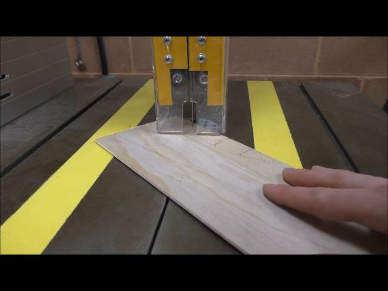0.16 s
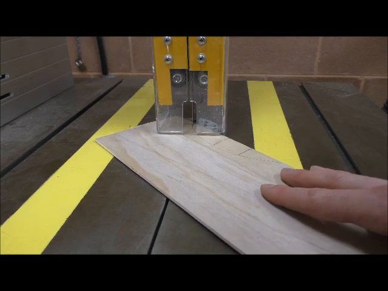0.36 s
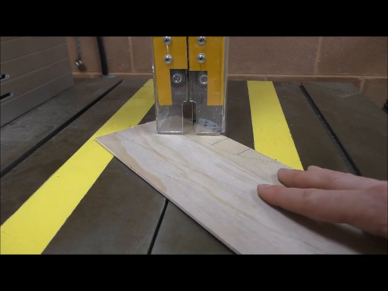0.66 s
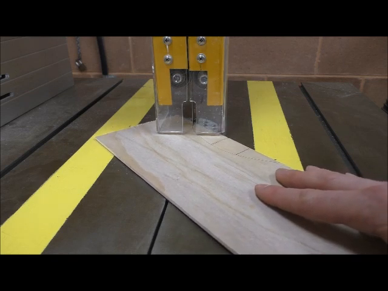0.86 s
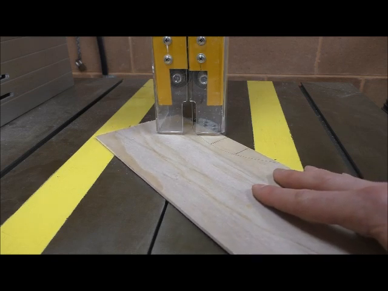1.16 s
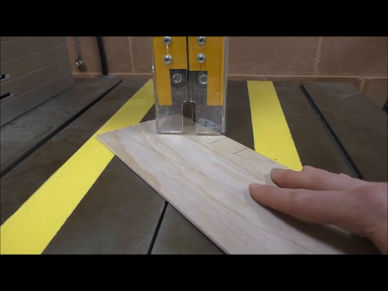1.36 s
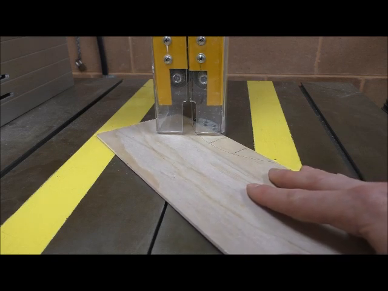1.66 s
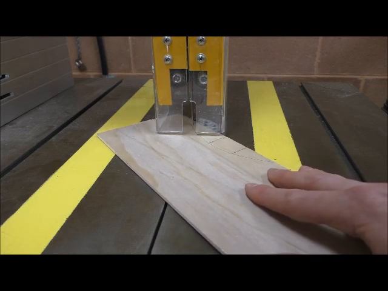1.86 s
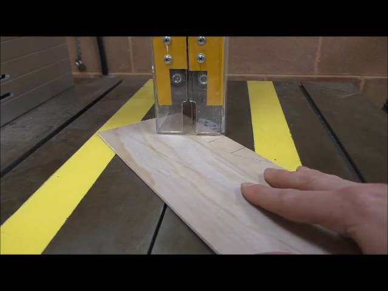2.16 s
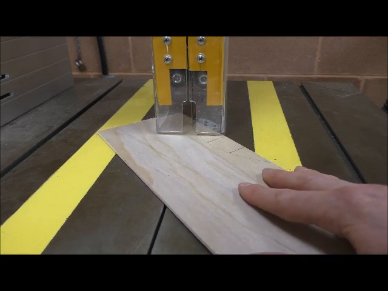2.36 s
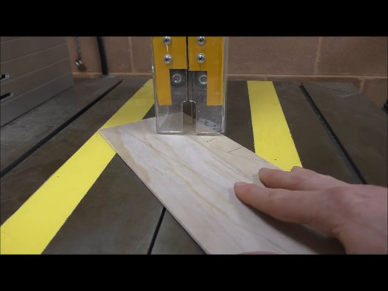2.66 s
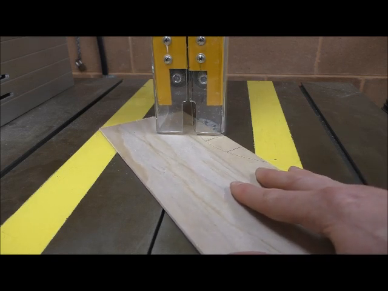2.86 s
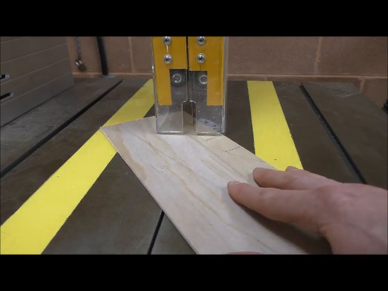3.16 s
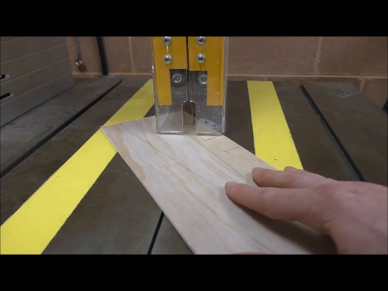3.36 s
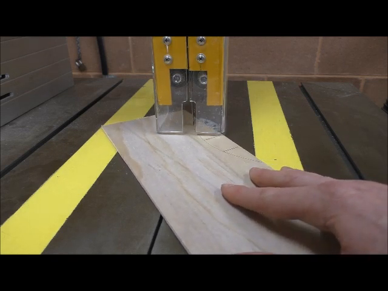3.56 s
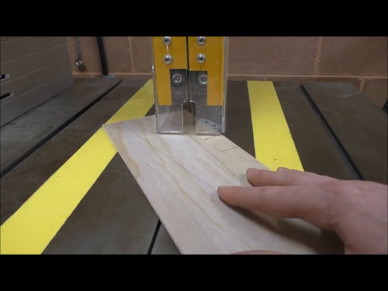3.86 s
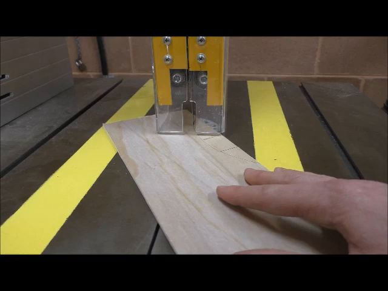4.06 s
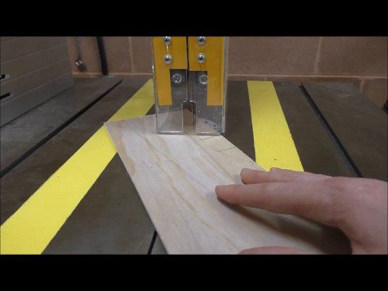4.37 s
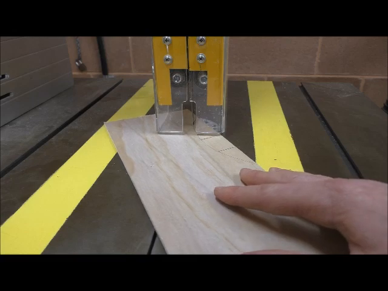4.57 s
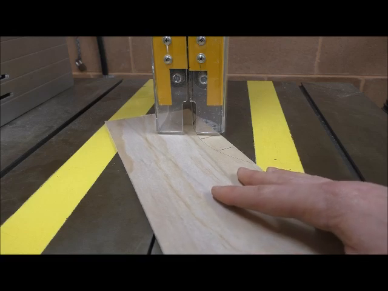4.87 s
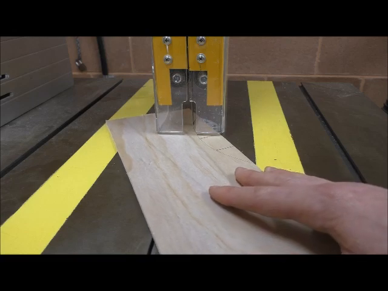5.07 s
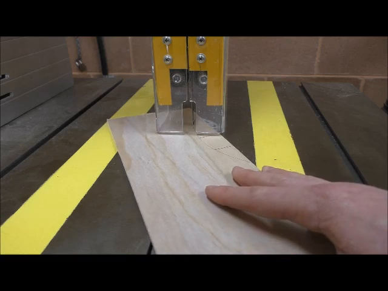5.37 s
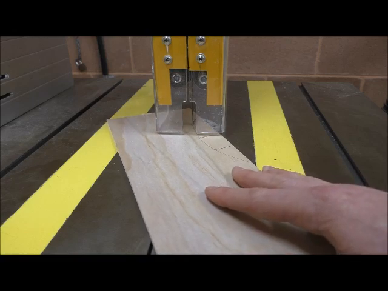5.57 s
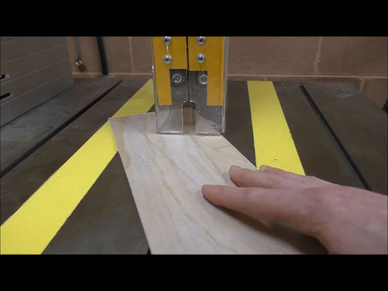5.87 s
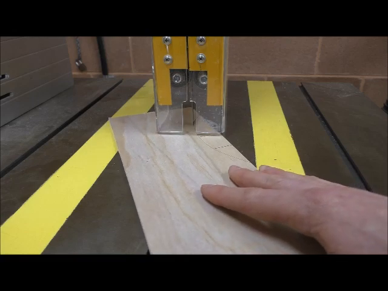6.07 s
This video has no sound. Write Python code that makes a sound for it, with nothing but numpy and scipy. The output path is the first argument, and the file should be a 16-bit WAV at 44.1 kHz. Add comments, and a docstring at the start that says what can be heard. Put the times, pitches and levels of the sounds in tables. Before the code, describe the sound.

Close-up of a bandsaw in a small, fairly dry workshop. Fast blade teeth blend into a buzzing, sizzling hiss through thin wood, with a regular thud each blade lap. Squeals slide downward at first, the hiss grows sharper midway, then the turning board rings and chatters with splinter snaps and brief drops in force. A faint motor hum and table rumble stay far below the cut.

```python
"""Bandsaw cutting a curve in plywood

A bandsaw cuts thin plywood; every tooth is a short strike plus a fading burst of chip noise.
Proud teeth and the weld return with each lap of the blade, and splinters crack off at random.
This sound drives the resonances of blade and board, whose colour shifts as the board is turned.
Sines and filtered noise add whines, board ring, motor hum and rumble; the cut and frame get short
reflections, and a faint low wash of room noise lies underneath."""
import sys
import numpy as np
from scipy import signal
from scipy.io import wavfile
from scipy.ndimage import uniform_filter1d, map_coordinates

SR = 44100
rng = np.random.default_rng(int(sys.argv[2]) if len(sys.argv) > 2 else 0)


def store_wav(level_fs):
    """Save 16-bit WAV to argv[1]."""
    pcm = np.round(np.clip(np.atleast_2d(level_fs), -1, 1) * 32767)
    wavfile.write(sys.argv[1], SR, pcm.T.astype(np.int16))


N = 273861
TIME = np.arange(N) / SR


def from_db(db):
    """Decibels to gain."""
    return 10 ** (np.asarray(db) / 20)


def rms_one(x):
    """Scale to unit power."""
    return x / np.sqrt(np.mean(x ** 2) + 1e-20)


def evened(x, size=22000):
    """Unit power over a running window of size samples; faster detail stays."""
    return x / np.sqrt(uniform_filter1d(x ** 2, size) + 1e-20)


def in_time(rows):
    """Each column of a curve at every sample."""
    s, *columns = np.transpose(rows)
    return [np.interp(TIME, s, column) for column in columns]


def swell(at_s, spread_s):
    """A smooth rise to 1 and fall again."""
    return np.exp(-.5 * ((TIME - at_s) / spread_s) ** 2)


def spells(rows, edge_s):
    """Each row holds its level from start to end, with soft edges; 0 in between."""
    total = 0
    for start_s, end_s, db in rows:
        gate = .5 * (np.tanh((TIME - start_s) / edge_s) - np.tanh((TIME - end_s) / edge_s))
        total = total + db * gate
    return total


def drift(rate):
    """Smooth chance of spread 1 with rate new random points a second."""
    knots = rng.standard_normal(4000)
    return rms_one(map_coordinates(knots, [TIME * rate], order=3, mode="wrap"))


def band(x, low_hz, high_hz, order=2):
    """Butterworth band-pass."""
    return signal.sosfilt(signal.butter(order, [low_hz, high_hz], "band", fs=SR, output="sos"), x)


def below(x, hz):
    """The part under an edge, without delay, so that the remainder joins it again seamlessly."""
    return signal.sosfiltfilt(signal.butter(4, hz, fs=SR, output="sos"), x)


def resonance(x, hz, width_hz):
    """A damped mode with gain 1 on its top."""
    return signal.lfilter(*signal.iirpeak(hz, hz / width_hz, fs=SR), x)


def noise_bursts(snaps, decay_s):
    """Each snap starts a burst of noise that falls away exponentially."""
    envelope = signal.lfilter([1], [1, -np.exp(-1 / (decay_s * SR))], snaps + 1e-18)
    return envelope * rng.standard_normal(N)


def tone(hz, waver_db, wobble_rad):
    """A machine tone that wavers a little in level and phase; rms 1."""
    phase = 2 * np.pi * hz * TIME + wobble_rad * drift(7.3)
    return rms_one(from_db(waver_db * drift(11)) * np.sin(phase))


def placed(x, pan_db, lead_s):
    """A source off centre is louder and earlier at the nearer ear (+ is left)."""
    ears = []
    for side in (.5, -.5):
        ears.append(from_db(side * pan_db) * np.interp(TIME + side * lead_s, TIME, x))
    return np.array(ears)


def room_tone(floor_db):
    """The faint low wash of the workshop, as band-passed noise."""
    return from_db(floor_db) * rms_one(band(rng.standard_normal(N), 24, 340, order=1))


def workshop(x, t60, thin_hz, dull_hz, wet_db):
    """Dense, dull reflections from the table or the walls: decaying noise, different at each ear."""
    age = TIME[:SR // 2]
    tail = rng.standard_normal((2, len(age))) * from_db(-60 * age / t60) * (age > .002)
    tail /= np.sqrt(np.sum(tail ** 2, axis=1, keepdims=True))
    tail = band(tail, thin_hz, dull_hz, order=1)
    return from_db(wet_db) * signal.fftconvolve(x[None], tail, axes=1)[:, :N]


def motor_hum():
    """Low motor tones swell and fade in one long arch."""
    # tones of the motor: pitch_hz, level_db (relative to the hum), arch_share (of the arch in dB)
    motor_tones = [(114.6, -22.5, 0.46), (227.3, 0.5, 0.94)]
    hum_db, peak_s, rise_db_per_s2, fall_db_per_s2 = -53.5, 2.68, 3, 2.5
    arch_db = -np.where(TIME < peak_s, rise_db_per_s2, fall_db_per_s2) * (TIME - peak_s) ** 2
    hum = 0
    for hz, db, share in motor_tones:
        hum = hum + from_db(hum_db + db + share * arch_db) * tone(hz, waver_db=1.67, wobble_rad=0.12)
    return hum


def machine_frame(feed_db, tones_feed_share):
    """Steady low tones grow as the board is swung round; the frame rumbles with the push."""
    # steady low tones: pitch_hz, level_db (before trim, push and swell)
    low_tones = [(86, -89), (258.4, -66.5)]
    # spells in which the board drums on the table more (+) or less (-):
    # start_s, end_s, level_db (about the resting rumble)
    rumbles = [(0, .55, -3.5), (.66, .85, 4.5), (1.08, 1.27, 5), (1.33, 1.6, -6), (1.9, 2.8, 3),
               (4.12, 4.4, 4), (4.68, 4.98, 4), (5.08, 5.24, 9), (5.5, 5.75, 5)]
    trim_db, swell_db = -5.5, 10
    tones_db = trim_db + tones_feed_share * feed_db + swell_db * swell(at_s=3.83, spread_s=0.53)
    tones = 0
    for hz, db in low_tones:
        tones = tones + from_db(db + tones_db) * tone(hz, waver_db=2.5, wobble_rad=0.76)
    rumble_db, feed_share = -70.5, 0.51
    rumble_db = rumble_db + feed_share * feed_db + spells(rumbles, edge_s=0.02)
    rumble = from_db(rumble_db) * evened(band(rng.standard_normal(N), 140, 197), size=7000)
    return tones + rumble


def flutter(width_hz):
    """The band flutters between its guides: narrow noise makes blurred low tones that swell once."""
    # flutter tones: pitch_hz, level_db (relative to the flutter)
    flutter_tones = [(387, -5.5), (516, 0), (645, -1)]
    resting_db, swell_db = -77.5, 14.5
    level_db = resting_db + swell_db * swell(at_s=1.09, spread_s=0.46)
    out = 0
    for hz, db in flutter_tones:
        blurred = resonance(resonance(rng.standard_normal(N), hz, width_hz), hz, width_hz)
        out = out + from_db(level_db + db) * evened(blurred)
    return out


def singing(travel, feed_db):
    """Thin clean tones: a whine at twice the tooth rate, a side tone and the guide bearing."""
    # spells in which the band whines: start_s, end_s, level_db (above its resting level)
    whines = [(.47, .75, 15.5), (.8, 1.02, 15), (1.15, 1.3, 8), (1.45, 1.9, 12), (1.9, 2.88, 12.5),
              (4.85, 5.7, 7.5)]
    whine_db = -68.5 + spells(whines, edge_s=0.031)
    waver = from_db(1.3 * drift(20))
    whine = from_db(whine_db) * rms_one(waver * np.sin(2 * np.pi * 2 * travel))

    side_order = 2.8846   # multiple of the tooth rate, just under the third harmonic
    side_db, feed_share = -75, 0.63
    side_tone = rms_one(np.sin(2 * np.pi * side_order * travel))
    side_tone = from_db(side_db + feed_share * feed_db) * side_tone

    # the bearing sings as the band is twisted against it
    bearing_db = -84 + 22.5 * swell(at_s=4.65, spread_s=1.16)
    bearing = from_db(bearing_db) * tone(1416, waver_db=2.5, wobble_rad=0.8)
    return whine + side_tone + bearing


def knocks(weld, feed_db, low_hz, high_hz):
    """The weld drags through the kerf with a wooden thud each lap, harder as the curve tightens."""
    start_db, growth_db_per_s, feed_share = -54.5, 0.96, 0.17
    level_db = start_db + growth_db_per_s * TIME + feed_share * feed_db
    return from_db(level_db) * weld * evened(band(rng.standard_normal(N), low_hz, high_hz), size=400)


def board_ring(travel, steady_db, chatter_db, waver_db, stray_hz):
    """The board rings at the tooth rate, and around a slightly lower, wobbling pitch as it chatters."""
    # shared level of both rings: time_s, level_db (before the steady and chatter levels)
    ring_curve = [(0.05, -72), (0.2, -58.5), (1.0, -56.5), (1.65, -67), (2.3, -60), (2.9, -55.5),
                  (3.4, -56), (4.27, -50), (4.38, -61), (4.52, -48), (5.0, -48.5), (5.15, -60.5),
                  (5.62, -42.5), (5.82, -66), (6.0, -73), (6.05, -44.5), (6.11, -72)]
    centre_hz, wobble_hz, wobbles_per_s = 1099.7, 15.2, 9.83
    hz = centre_hz + wobble_hz * np.cos(2 * np.pi * wobbles_per_s * TIME) + stray_hz * drift(40)
    waver = from_db(waver_db * np.tanh(drift(21.94)))
    chatter = rms_one(waver * np.sin(2 * np.pi * np.cumsum(hz) / SR))
    steady = rms_one(np.sin(2 * np.pi * travel))
    level = from_db(in_time(ring_curve)[0])
    return level * (from_db(steady_db) * steady + from_db(chatter_db) * chatter)


def blade(x):
    """The steel band rings in several damped modes at once."""
    # ringing modes of the band: pitch_hz, width_hz, level_db (relative to what strikes it)
    blade_modes = [(3170, 1450, -10.5), (7060, 970, -6.5), (9040, 370, -12.5), (10180, 510, -2),
                   (11800, 420, -2), (13450, 210, -4)]
    return sum(from_db(db) * resonance(x, hz, width_hz) for hz, width_hz, db in blade_modes)


def splinters(per_s, size_db, decay_s):
    """Now and then a fibre snaps: a randomly timed, short noise burst."""
    scatter_db = np.clip(rng.standard_normal(N), -2, 1.5)
    snaps = (rng.random(N) < per_s / SR) * from_db(size_db + scatter_db)
    return noise_bursts(snaps, decay_s)


def cracks(trim_db, decay_s, ring_db):
    """A larger splinter breaks off with a bright snap that sets the band ringing."""
    # the loudest splinters: time_s, level_db (before trim, filtering and ring)
    loud_splinters = [(3.2725, -23), (4.267, -27), (4.7229, -20), (4.754, -23), (5.056, -21), (5.6777, -30),
                      (5.9847, -24), (6.016, -28)]
    snaps = np.zeros(N)
    for s, db in loud_splinters:
        snaps[int(s * SR)] = from_db(db + trim_db)
    burst = noise_bursts(snaps, decay_s)
    return band(burst, 2800, 14000, order=1) + from_db(ring_db) * blade(burst)


def near(lap, place, width):
    """A bump each time a place on the blade passes through the wood; place and width in laps."""
    distance = (lap - place + .5) % 1 - .5
    return np.exp(-.5 * (distance / width) ** 2)


def teeth(travel, proud_db, proud_share, scatter_db, flutter_db, chip_decay, strike_db,
          snag_share, snag_noise_db):
    """Every tooth gives a sharp strike and a burst of tearing fibres; proud teeth also snag the band."""
    tooth = travel.astype(int)
    # the wood is uneven, from tooth to tooth and in a faster-than-lap drift
    grain_db = scatter_db * rng.standard_normal(8000)[tooth] + flutter_db * drift(130)
    # a triangle about two samples wide whenever a tooth arrives
    strikes = np.maximum(0, 1 - np.abs(travel - np.round(travel)) / np.gradient(travel))
    strikes = rms_one(strikes)
    # chip_decay is a share of the tooth spacing
    chips = rms_one(rng.standard_normal(N) * np.exp(-(travel % 1) / chip_decay))
    tearing = from_db(proud_share * proud_db + grain_db) * (chips + from_db(strike_db) * strikes)

    catch = (from_db(snag_share * proud_db) - 1) * from_db(grain_db)
    rebound = 0.37 * catch.mean()   # between snags the band springs back
    snags = (catch - rebound) * strikes + catch * from_db(snag_noise_db) * chips
    return rms_one(tearing), rms_one(snags)


def sliding(x, glide):
    """A resonance whose centre moves: it is followed in a frame that turns with it."""
    width_hz = 250
    hz, boost_db = in_time(glide)
    turning = np.exp(2j * np.pi * np.cumsum(hz) / SR)
    keep = np.exp(-np.pi * width_hz / SR)
    smoothed = signal.lfilter([1 - keep], [1, -keep], x / turning)
    return (from_db(boost_db) - 1) * 2 * np.real(turning * smoothed)


def body_and_board(x):
    """Fixed, waking and sliding resonances colour the cut; each adds its peak or hollow."""
    # lasting peaks and hollows of blade, guard and table: pitch_hz, width_hz, boost_db
    body = [(535, 105, -8), (1233, 170, 4), (1600, 1200, -5), (5280, 770, -8), (9860, 220, 1),
            (12200, 190, 5.5), (13500, 170, 3), (14500, 240, 7.5), (15800, 200, 3)]
    # modes and hollows that wake and fade as the board turns:
    # pitch_hz, width_hz, boost_db (at its strongest), strongest_s, spread_s
    board_modes = [(313, 31, 8.5, 0.3, 0.33), (380, 150, 6, 4.86, 0.18), (990, 190, 22, 3.64, 0.72),
                   (1060, 220, 14, 5.26, 0.32), (1230, 610, 7, 2.2, 1.2), (1434, 66, 15.5, 0.28, 0.88),
                   (1650, 150, -5.5, 0.88, 0.89), (1410, 60, 6, 5.3, 0.8), (2615, 87, 14, 0.26, 0.6),
                   (2650, 160, 7, 5.69, 0.14), (2660, 350, 4.5, 2.81, 0.093), (3220, 31, 10, 5.69, 0.061),
                   (3442, 120, 14.5, 3.54, 0.65), (3596, 80, 13.5, 1.1, 1.04),
                   (3880, 220, 12.5, 5.06, 0.34), (3770, 120, 15, 6.14, 0.44), (4650, 850, 8.5, 2.46, 0.23),
                   (4700, 170, -13, 4.8, 0.99), (6230, 170, -9, 5.7, 0.41), (6650, 560, -10, 0.33, 0.89),
                   (6870, 140, -13, 5.1, 0.34), (6860, 500, 4.5, 6, 0.2), (7380, 320, 5.5, 0.98, 0.7),
                   (9140, 240, -9, 4.4, 0.9), (4990, 220, 17, 5.76, 0.58), (5260, 120, 20.5, 4.02, 0.7),
                   (5640, 240, 14.5, 5.04, 0.3), (5370, 860, 7.5, 0.14, 0.81),
                   (6434, 410, 16.5, 4.05, 1.05), (7170, 410, 10.5, 5.2, 0.99), (7930, 780, 14, 2.83, 0.24),
                   (8100, 150, 12.5, 4, 0.42), (8250, 640, -17, 1.7, 0.53), (8700, 97, 13.5, 3.55, 0.68),
                   (8820, 350, 7.5, 0.33, 2.1), (9560, 450, 14.5, 3.56, 0.73), (10220, 520, 9.5, 5, 0.57),
                   (10700, 250, -16, 3.2, 0.56), (10920, 250, 17.5, 3.1, 1.22),
                   (11040, 1300, 12.5, 0.22, 0.21), (11250, 700, -17, 5.8, 0.4),
                   (13350, 350, 14, 5.67, 0.54), (13200, 460, -11, 0.89, 0.4), (12850, 300, -19, 3.5, 0.44),
                   (13500, 820, 10.5, 3.3, 0.77), (15000, 1100, 4, 1.9, 0.77)]
    # two squealing resonances, the lower taking over from the upper: time_s, pitch_hz, boost_db
    upper_squeal = [(0.2, 4760, 10), (0.27, 4630, 16.5), (0.42, 4400, 10), (0.55, 4430, 15),
                    (0.76, 4570, 6), (1.0, 4530, 7), (1.35, 4500, 1)]
    lower_squeal = [(0.6, 4160, 6), (0.72, 4100, 10), (0.92, 4000, 11.5), (1.05, 3780, 7), (1.24, 3600, 8),
                    (1.4, 3450, 5), (1.7, 3450, -2.5)]
    # a higher scrape resonance, lower by the end: time_s, pitch_hz, boost_db
    scrape_mode = [(2.9, 6620, 7.5), (3.55, 6720, 6.5), (4.1, 6700, 5), (4.45, 6400, 10), (4.781, 6400, 7),
                   (4.98, 6300, -1)]
    # a last short sinking squeal: time_s, pitch_hz, boost_db
    late_squeal = [(5.2, 4800, 3), (5.33, 4650, 4), (5.5, 4480, 9), (5.62, 4400, -1), (5.9, 4400, -3)]
    for hz, width_hz, boost_db in body:
        x = x + (from_db(boost_db) - 1) * resonance(x, hz, width_hz)
    for hz, width_hz, boost_db, at_s, spread_s in board_modes:
        x = x + (from_db(boost_db * swell(at_s, spread_s)) - 1) * resonance(x, hz, width_hz)
    return x + sum(sliding(x, glide) for glide in (upper_squeal, lower_squeal, scrape_mode, late_squeal))


def balanced(x, feed_db, grip_db, proud_db, lowest_hz, uneven_db, flicker_db):
    """Each register follows push, grip and bite by its own share, and swells as the board turns."""
    # registers of the cut: upper_edge_hz, level_db (before push, grip, swells and chance),
    # feed_share, grip_share, bite_share (shares of the dB curves, bite is that of the proud teeth)
    registers = [(708, -63.5, 0.65, 0.29, 0.13), (1700, -52.5, 0.96, 0.38, 0.14),
                 (5700, -45, 0.71, 0.41, 0.039), (8260, -52, 0.61, 1.16, 0.15),
                 (12020, -44.5, 0.44, 0.89, 0.045), (17000, -51, 0.5, 1.3, .15)]
    # swells of the hiss: around_hz (picks the register), strongest_s, spread_s, level_db
    hiss_swells = [(1100, 3.39, 0.23, 4), (1100, 5.1, 0.52, -1.4), (3500, 0.82, 0.5, 5),
                   (3500, 1.19, 0.056, 2.5), (3500, 3.6, 0.35, -1), (3500, 6, 0.12, 6.5),
                   (3500, 4.93, 0.033, 1.5), (3500, 5.7, 0.046, 0.5), (3500, 2.97, 0.055, 2),
                   (3500, 6.18, 0.031, 5), (6500, 2, 0.2, 7.5), (6500, 3.69, 0.56, 14.5),
                   (6500, 4.51, 0.15, 4.5), (10000, 2.86, 0.57, 4), (10000, 3.8, 0.91, 4.5),
                   (14000, 2, 0.95, 11.5), (14000, 4.1, 0.69, -4), (14000, 4.96, 0.28, 6.5)]
    out, low_hz = 0, lowest_hz
    rest = x - below(x, lowest_hz)
    wood_db = uneven_db * drift(18)   # harder and softer patches in the plies
    for edge_hz, level_db, feed_share, grip_share, bite_share in registers:
        register = below(rest, edge_hz)
        turn_db = 0
        for hz, at_s, spread_s, db in hiss_swells:
            if low_hz < hz <= edge_hz:
                turn_db = turn_db + db * swell(at_s, spread_s)
        chance_db = wood_db + flicker_db * drift(25)
        gain_db = level_db + feed_share * feed_db + grip_share * grip_db + turn_db + chance_db
        out = out + from_db(gain_db) * evened(register * from_db(bite_share * proud_db))
        rest, low_hz = rest - register, edge_hz
    return out


def cut(feed_db, weld_db, weld_width, slip_teeth, proud_width, lowest_hz):
    """The teeth drive the resonances; the thick weld swells the cut and knocks the board once a lap."""
    # blade speed: time_s, teeth_per_s
    speed = [(0, 1115.6), (1.5, 1113.9), (2.6, 1112.8), (3.6, 1114.2), (4.3, 1113.8), (6.2, 1114.6)]
    # teeth that stand proud and bite deeper: place_laps, bite_db (before each layer's share)
    proud_teeth = [(.035, 9.5), (.095, 6), (.127, 9), (.16, 3), (.188, 8), (.23, 3), (.28, 8), (.31, 8),
                   (.342, 8), (.373, 7), (.408, 9), (.467, 5), (.497, 6), (.527, 8), (.558, 5), (.59, 8),
                   (.62, 9), (.652, 6), (.68, 6), (.715, 10), (.743, 4), (.772, 6), (.8, 5), (.835, 9),
                   (.895, 10), (.926, 9), (.96, 9.5), (.985, 7.5)]
    # the turning board binds on the side of the blade (+) or lets it run free (-):
    # start_s, end_s, grip_db (before each layer's share)
    grips = [(-0.05, 0.03, 7), (0.05, 0.17, -0.5), (0.22, 0.32, 2), (1.16, 1.29, 0), (1.62, 1.65, -4),
             (1.7, 1.73, -3.5), (3.265, 3.285, 0.5), (3.3, 3.355, -2), (3.72, 3.77, -2.5),
             (3.98, 4.005, -6), (4.248, 4.262, 0.5), (4.266, 4.3, 1.5), (4.565, 4.62, -3),
             (4.82, 4.88, -2.5), (5.1, 5.14, -1.5), (5.36, 5.41, 0.5), (5.42, 5.655, -9),
             (5.67, 5.735, 2.5), (5.84, 5.91, 2.5), (5.92, 5.98, -2.5), (6.03, 6.08, 1.5), (6.12, 6.3, -6)]
    teeth_per_lap = 281.2
    # teeth passed so far; the band runs slightly unevenly
    travel = 1 + np.cumsum(in_time(speed)[0]) / SR + slip_teeth * drift(13)
    lap = (travel - 1) / teeth_per_lap
    grip_db = spells(grips, edge_s=0.0047)
    proud_db = sum(db * near(lap, place, proud_width) for place, db in proud_teeth)
    tearing, snags = teeth(travel, proud_db, proud_share=0.15, scatter_db=0.82, flutter_db=0.74,
                           chip_decay=0.6, strike_db=-12.5, snag_share=0.16, snag_noise_db=-28.0)
    x = tearing + splinters(per_s=13, size_db=-4.0, decay_s=0.0021)

    # the snags grow with push and grip, and more as the curve tightens
    tight_db = 17.5 * swell(at_s=7.4, spread_s=0.97)   # still rising at the end
    snag_db = 2.5 + 0.14 * feed_db + 0.63 * grip_db + tight_db
    x = x + blade(snags * from_db(snag_db))

    weld = near(lap, 0.0085, weld_width)
    x = x + (from_db(weld_db * weld) - 1) * below(x, 7200)   # the weld is felt mostly in the lower part
    x = body_and_board(x)
    hiss = balanced(x, feed_db, grip_db, proud_db, lowest_hz, uneven_db=0.24, flicker_db=0.9)
    thuds = knocks(weld, feed_db, low_hz=667, high_hz=1180)
    ring = board_ring(travel, steady_db=-8.5, chatter_db=-2.5, waver_db=4.0, stray_hz=4.02)
    snaps = cracks(trim_db=-18.5, decay_s=0.0035, ring_db=17.0)
    return hiss + thuds + ring + singing(travel, feed_db) + snaps


def scene():
    """The cut just ahead, its board tone to the left, the motor a little right, the room around."""
    # how hard the board is pushed into the blade: time_s, push_db (about the usual push)
    feed = [(0.1, -3.5), (0.83, 1.2), (1.23, 1.5), (1.38, -2.5), (1.68, -4.5), (1.95, -1.4), (2.9, 0.5),
            (3.06, -5.5), (4.28, 0.9), (4.97, 7.5), (5.08, 0), (5.69, 7), (5.78, -4.5), (6.21, -11)]
    # place of the cut: time_s, left_right_db (+ is left)
    cut_place = [(0.0, 0.5), (1.24, 0.5), (4.01, -0.5), (6.21, 1.0)]
    feed_db, = in_time(feed)
    saw = cut(feed_db, weld_db=3.5, weld_width=0.031, slip_teeth=0.03, proud_width=0.0035, lowest_hz=248)
    hum = motor_hum()
    frame = machine_frame(feed_db, tones_feed_share=0.51)
    board = resonance(saw, 1190, width_hz=120)

    direct = placed(saw - board, in_time(cut_place)[0], lead_s=0.000003)
    direct = direct + placed(board, pan_db=7.5, lead_s=0.00005)
    direct = direct + placed(hum + frame, pan_db=-1.5, lead_s=0.0002)
    direct = direct + placed(flutter(width_hz=17), pan_db=5, lead_s=0.00016)
    table = workshop(saw + frame, t60=0.055, thin_hz=80, dull_hz=3550, wet_db=-10.0)
    walls = workshop(saw + frame, t60=0.23, thin_hz=200, dull_hz=1510, wet_db=-16.0)
    return direct + table + walls + placed(room_tone(floor_db=-82.5), pan_db=-1.5, lead_s=0.0003)


def record(dry):
    """A steep elliptic low-pass removes the top."""
    cutoff_hz = 15800
    return signal.sosfilt(signal.ellip(12, .1, 80, cutoff_hz, fs=SR, output="sos"), dry)


dry = scene()
out = record(dry)
store_wav(out)
```